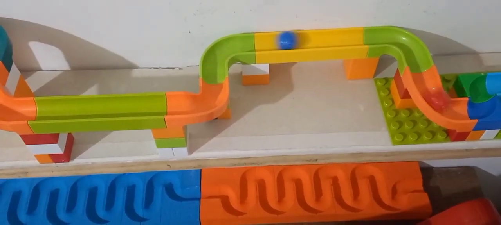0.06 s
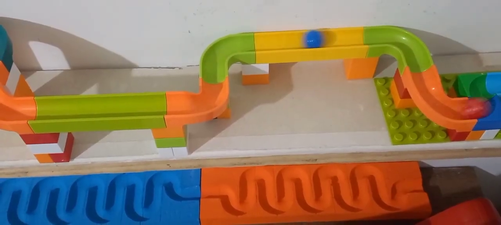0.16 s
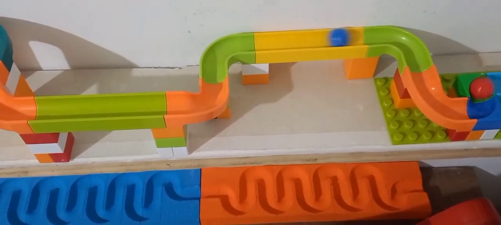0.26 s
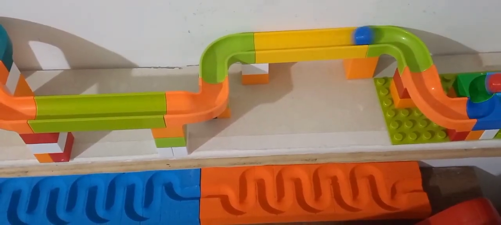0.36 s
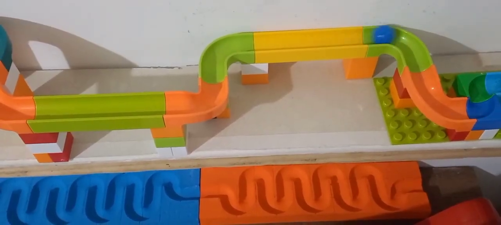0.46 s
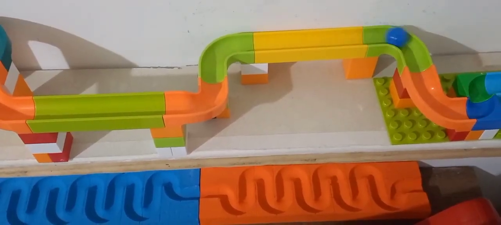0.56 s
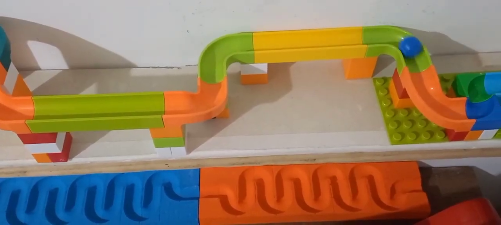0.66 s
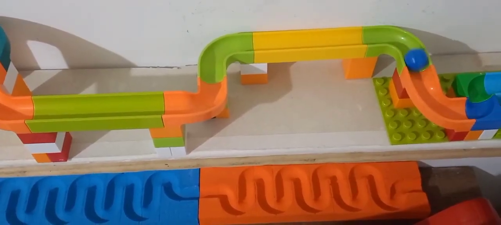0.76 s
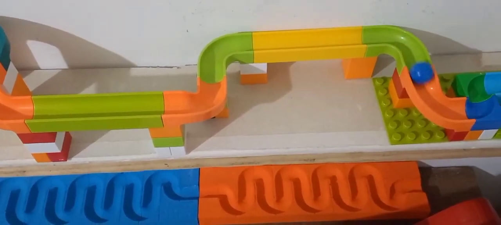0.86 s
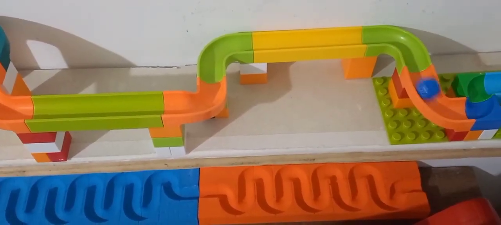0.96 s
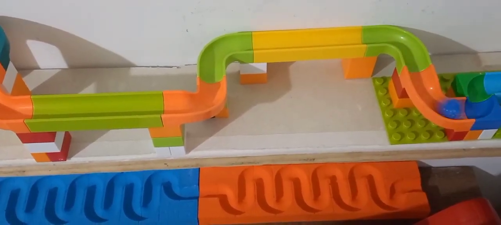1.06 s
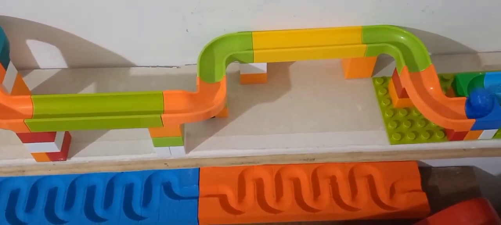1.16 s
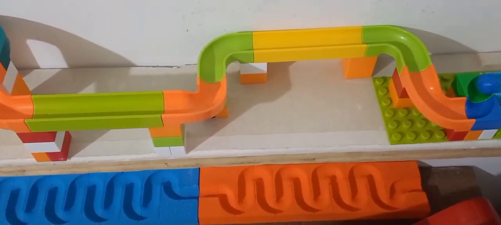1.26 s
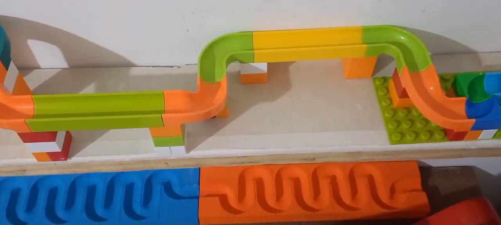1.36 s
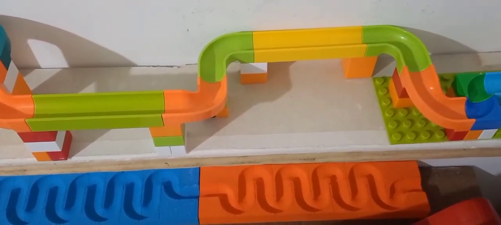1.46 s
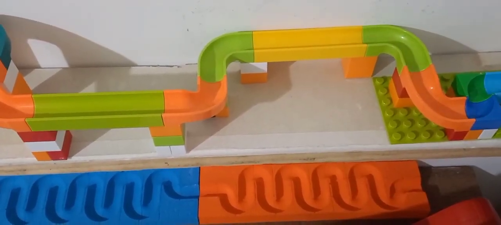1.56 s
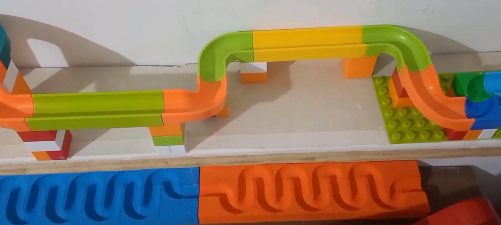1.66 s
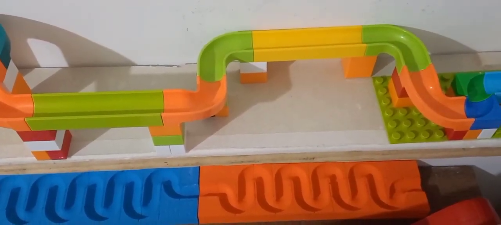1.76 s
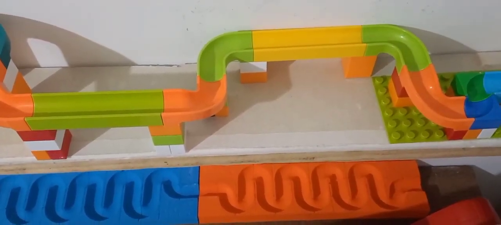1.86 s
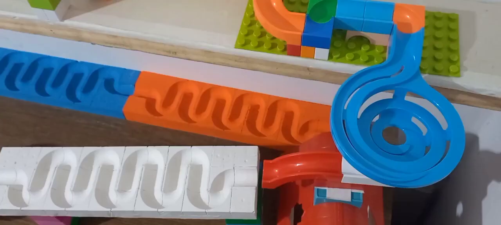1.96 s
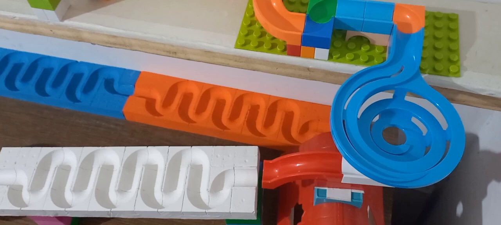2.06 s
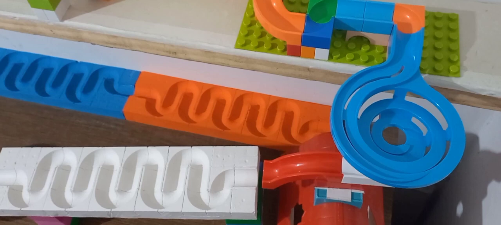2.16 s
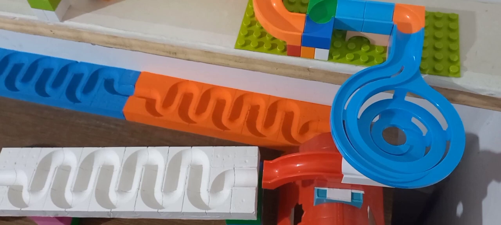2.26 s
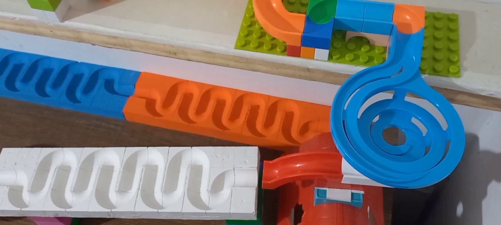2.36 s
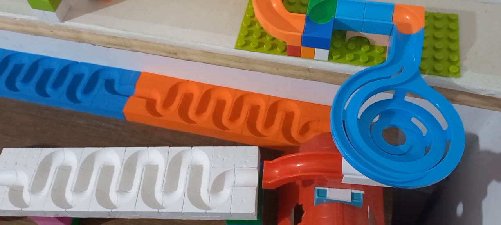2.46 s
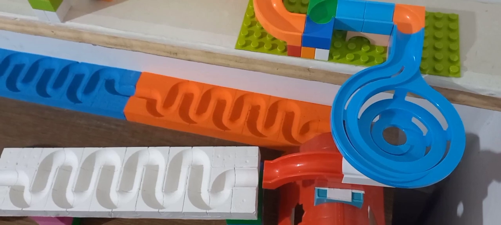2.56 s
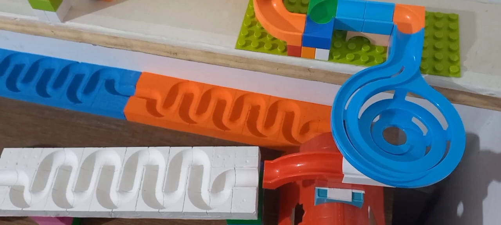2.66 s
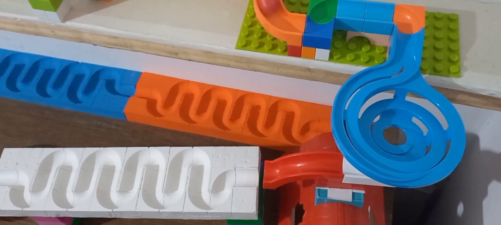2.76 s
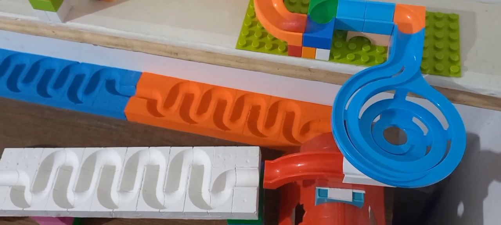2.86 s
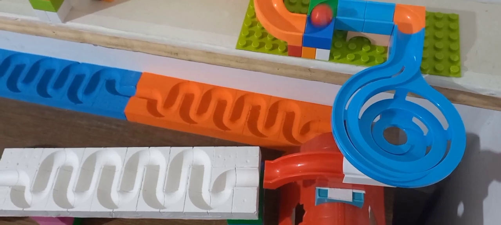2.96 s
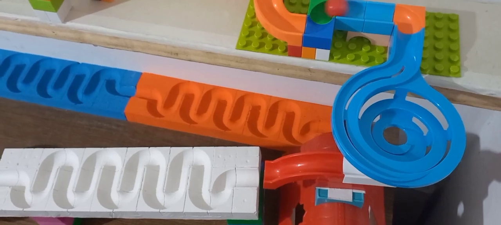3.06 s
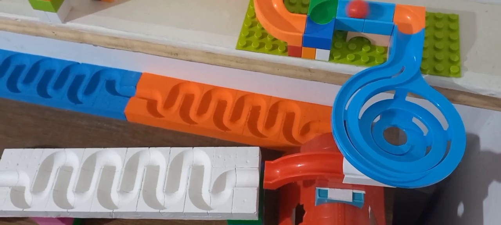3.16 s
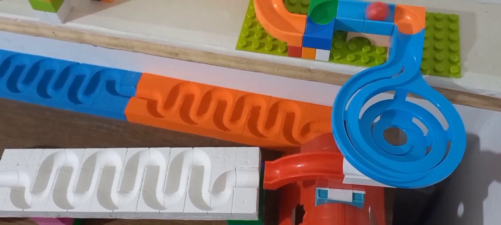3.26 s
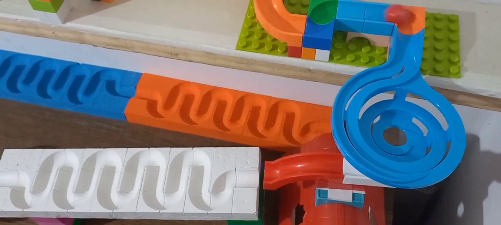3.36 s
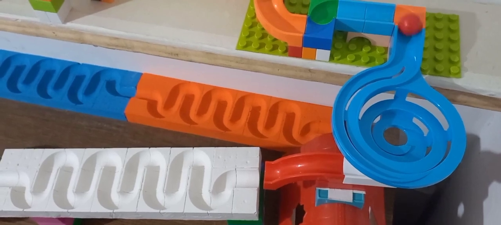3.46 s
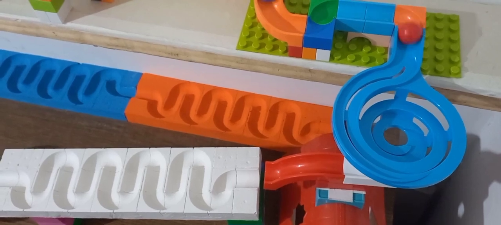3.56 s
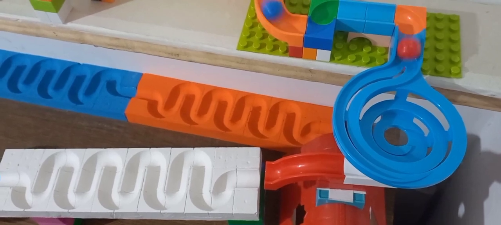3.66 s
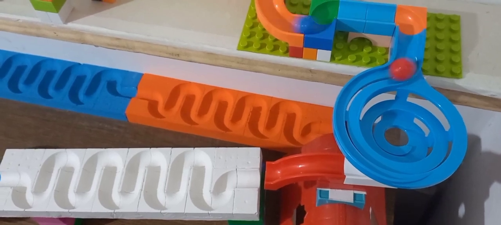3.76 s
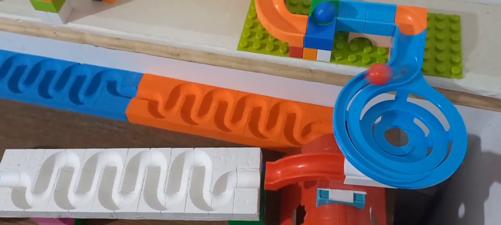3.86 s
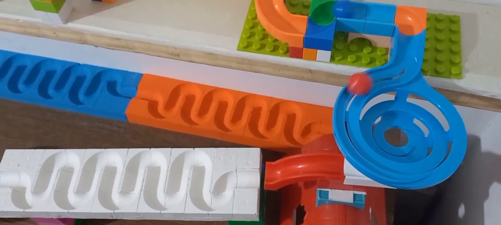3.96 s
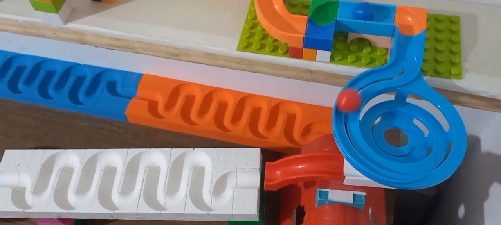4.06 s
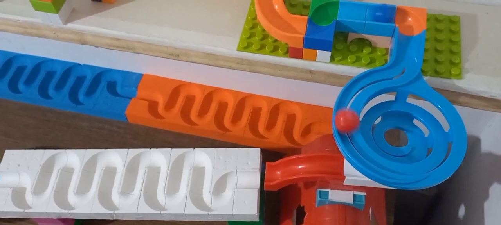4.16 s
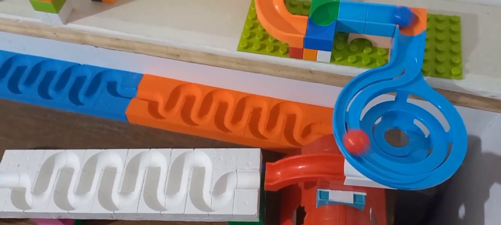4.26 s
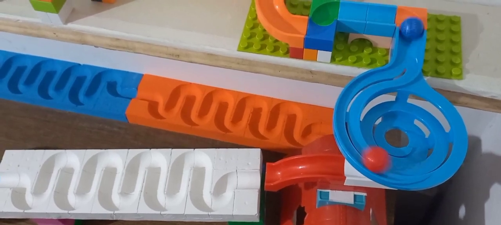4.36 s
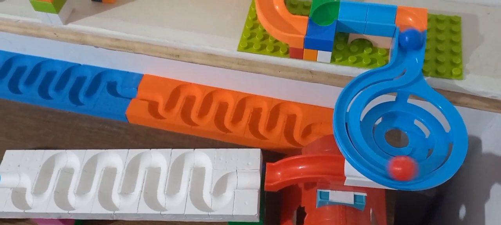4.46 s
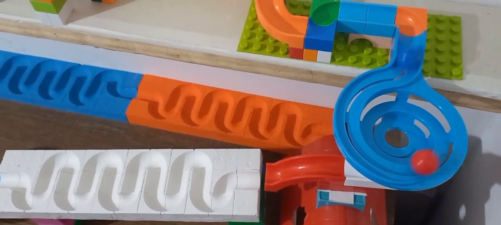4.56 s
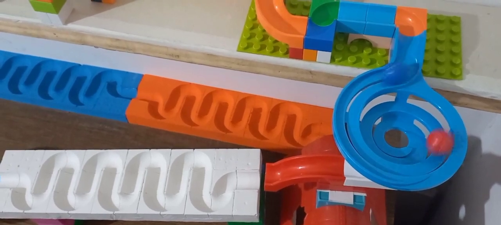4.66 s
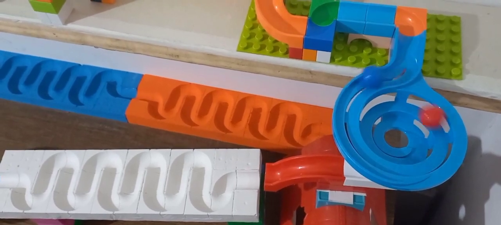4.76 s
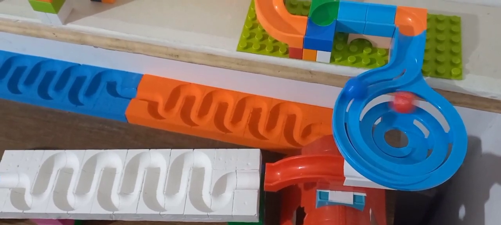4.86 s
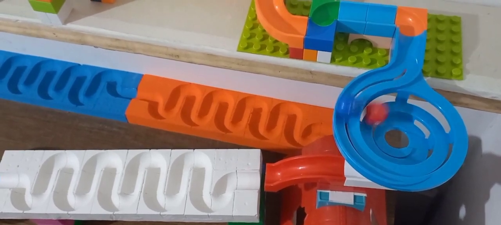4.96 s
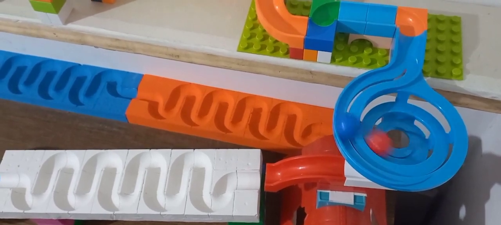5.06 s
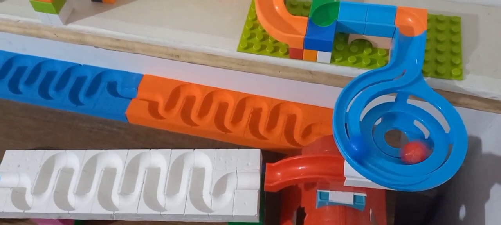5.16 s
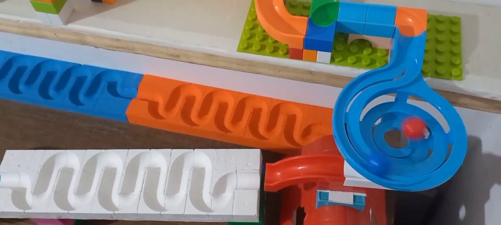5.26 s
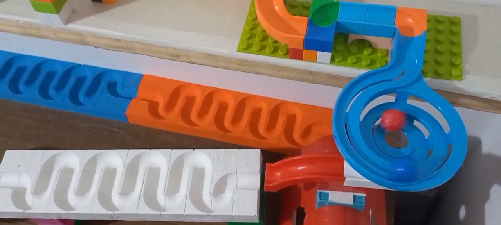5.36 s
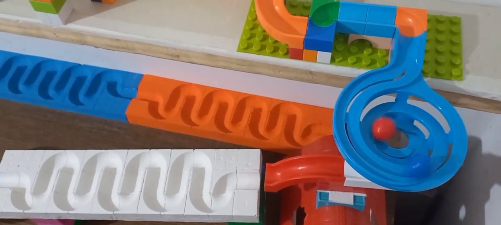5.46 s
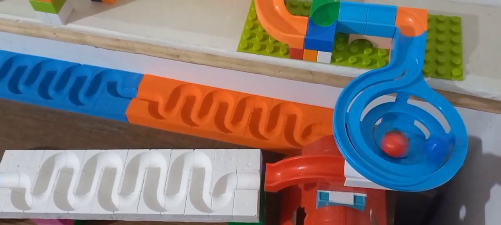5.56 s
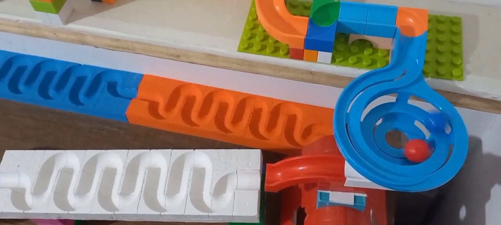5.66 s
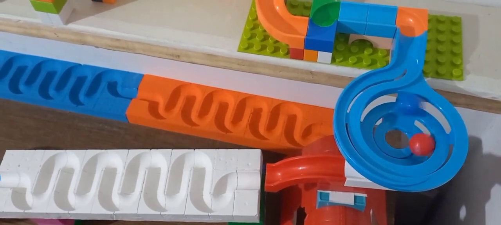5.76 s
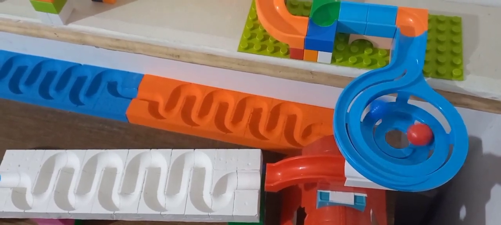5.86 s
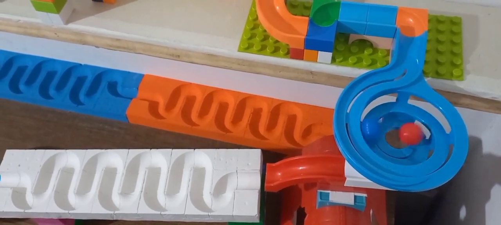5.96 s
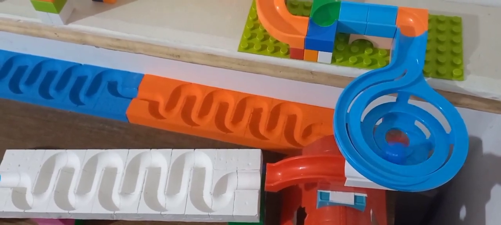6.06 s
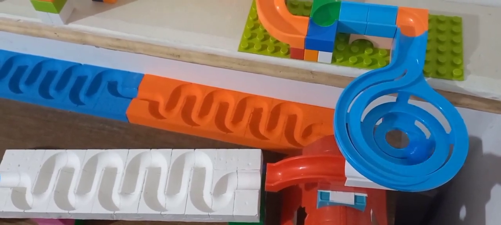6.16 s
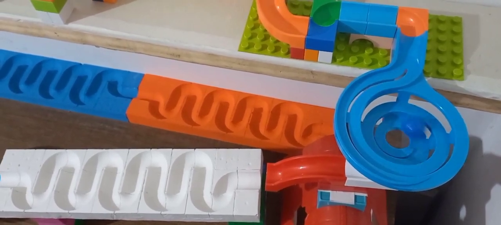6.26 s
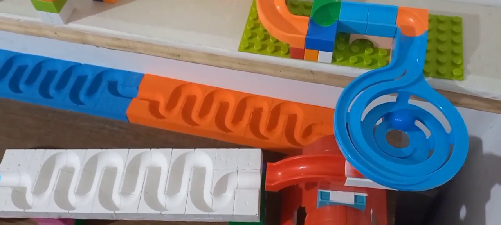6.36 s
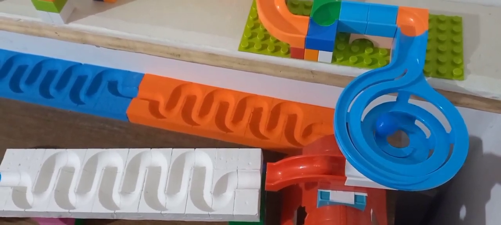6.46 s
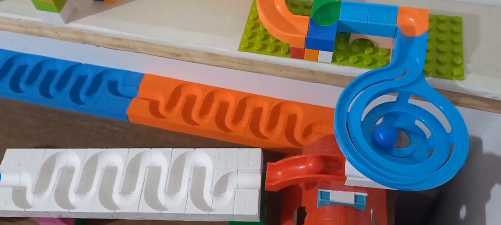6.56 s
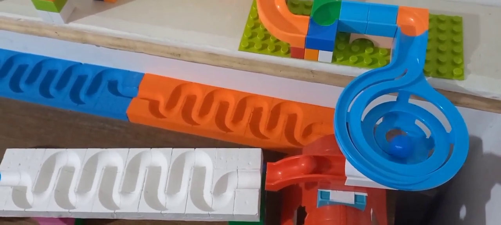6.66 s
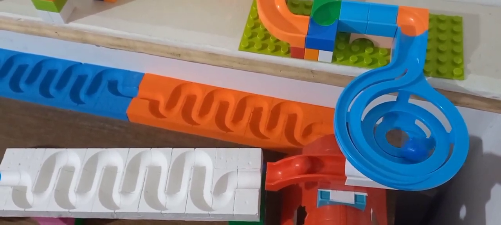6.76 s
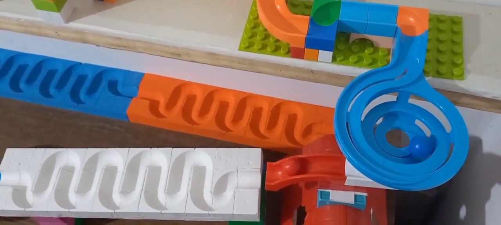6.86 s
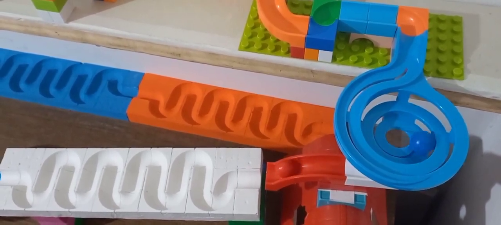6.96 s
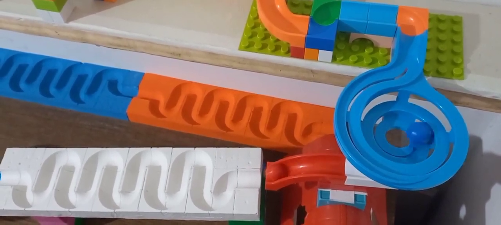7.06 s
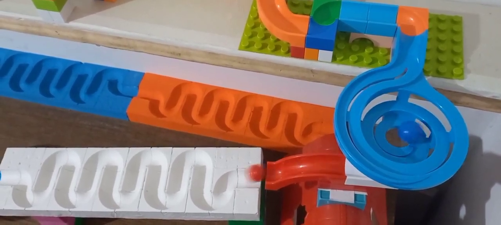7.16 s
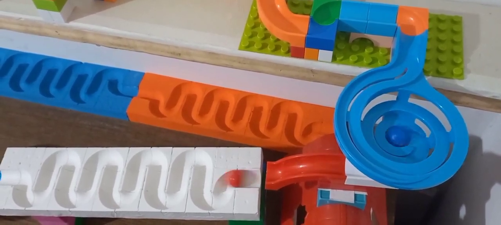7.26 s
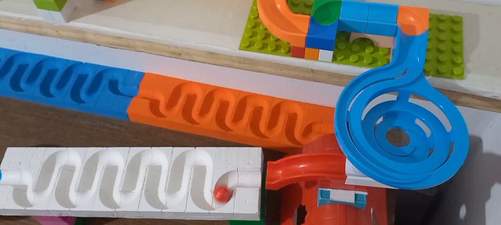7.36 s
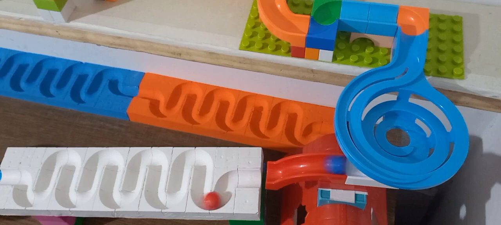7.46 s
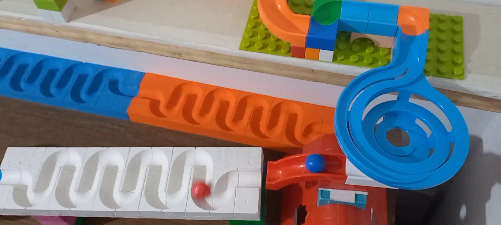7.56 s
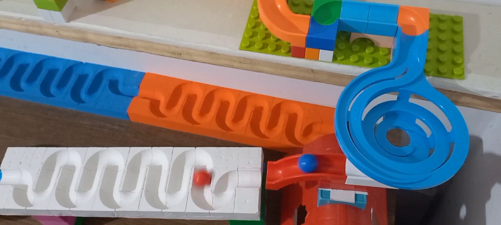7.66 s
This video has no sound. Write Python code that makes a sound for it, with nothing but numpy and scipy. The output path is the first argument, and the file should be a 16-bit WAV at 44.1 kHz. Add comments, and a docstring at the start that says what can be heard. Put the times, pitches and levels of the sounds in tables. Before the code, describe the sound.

Light papery rolling and plastic clicks indoors give way to swirling marble knocks in a dish and loud hollow drops.

```python
"""Two marbles run down a plastic toy track in a bare room: along open chutes, over toy blocks,
round a spiral funnel, through its hole into a hollow tower that booms, and into a winding groove.
Rolling is a hail of tiny bumps through the plastic's colour and modes; clacks are noise bursts with
ringing modes and a pinged spot. Steady noise is the air; the sound drops out twice, briefly."""
import sys
import numpy as np
from scipy import signal
from scipy.fft import rfft, irfft, next_fast_len
from scipy.io import wavfile
from scipy.ndimage import uniform_filter1d, map_coordinates

SR = 44100
rng = np.random.default_rng(int(sys.argv[2]) if len(sys.argv) > 2 else 0)


def wrap_up_sound(samples):
    """Save the sound to the file named by the first command line argument, as 16-bit audio."""
    columns = np.atleast_2d(samples).T
    # keep every value between -1 and 1, then stretch to whole-number steps
    tamed = np.clip(columns, -1, 1)
    steps = np.round(tamed * 32767).astype(np.int16)
    wavfile.write(sys.argv[1], SR, steps)


N = 339566
TIME = np.arange(N) / SR


def amp(db):
    """Amplitude factor of a level in dB."""
    return 10 ** (np.asarray(db) / 20)


def unit(x):
    """Scale to an RMS of one."""
    return x / np.sqrt(np.mean(x ** 2) + 1e-20)


def along(points, hz):
    """Interpolate (frequency [Hz], value) points on a log frequency axis."""
    point_hz, values = np.transpose(points)
    return np.interp(np.log(hz + 1), np.log(point_hz + 1), values)


def filtered(x, response):
    """Multiply the spectrum of x by a response of frequency."""
    size = next_fast_len(x.shape[-1] + SR // 4)
    spectrum = rfft(x, size) * response(np.fft.rfftfreq(size, 1 / SR))
    return irfft(spectrum, size)[..., :x.shape[-1]]


def causal(level_db, size=2048):
    """Minimum-phase impulse response for a level that depends on frequency."""
    level = amp(level_db(np.fft.rfftfreq(size, 1 / SR)))
    cepstrum = irfft(np.log(level + 1e-6))
    cepstrum[1:size // 2] *= 2
    cepstrum[size // 2 + 1:] = 0
    return irfft(np.exp(rfft(cepstrum)))


def treble(hz, edge_hz=3500):
    """Smooth step from 0 below the edge to 1 above it."""
    return 1 - 1 / (1 + (hz / edge_hz) ** 4)


def wobble(knots_per_s):
    """A random curve of straight pieces between knots."""
    knots = rng.standard_normal(int(N * knots_per_s / SR) + 4)
    return map_coordinates(knots, [TIME * knots_per_s], order=1)


def add(track, start_s, sound):
    """Mix a sound into a track at a time."""
    space = track[max(round(start_s * SR), 0):][:len(sound)]
    space += sound[:len(space)]


def spread(pair):
    """Two unrelated signals become a diffuse field: alike in the bass, unrelated in the treble."""
    # (frequency [Hz], left-right likeness [-1 to 1])
    likeness = [(100, 0.84), (300, 0.9), (700, 0.61), (1500, 0.063), (10000, 0)]

    def mid_side(hz):
        turn = np.arccos(np.clip(along(likeness, hz), -1, 1)) / 2
        return np.array([np.cos(turn), np.sin(turn)])

    mid, side = filtered(pair, mid_side)
    return np.array([mid + side, mid - side])


def in_room(x, rightward, wet_db, near_db):
    """Direct sound, quick echoes off shelf and wall, then the room's tail; the left lies in shadow."""
    # decay of the tail: (frequency [Hz], T60 [s])
    room_t60 = [(150, 1), (500, 0.52), (1400, 0.34), (2600, 0.49), (5500, 0.36), (12000, 0.3)]
    # source fully to the right: (frequency [Hz], left minus right [dB])
    head_shadow = [(120, -4.5), (250, -2.5), (500, -4.5), (1000, 2.5), (2200, -9), (4500, -3), (8000, -15),
                   (12000, -9)]
    hz, t, z = signal.stft(rng.standard_normal((2, SR)), SR, nperseg=256)
    decay = amp(-60 * t / along(room_t60, hz)[:, None])
    tail = signal.istft(z * decay, SR, nperseg=256)[1][:, :SR]
    t = np.arange(SR) / SR
    tail = unit(tail * (1 - np.exp(-t / 0.004)))
    near = unit(rng.standard_normal((2, SR)) * amp(-60 * t / 0.059))
    echoes = spread(amp(wet_db) * tail + amp(near_db) * near) / np.sqrt(SR)
    heard = x + signal.fftconvolve(x[None], echoes, axes=1)[:, :N]
    halves = np.array([[0.5], [-0.5]])  # left, right
    return filtered(heard, lambda hz: amp(rightward * along(head_shadow, hz) * halves))


def ring(modes, t):
    """Damped modes, struck at new strengths and phases; a wider mode dies sooner."""
    strengths_db = rng.normal(0, 2, len(modes))
    tones = np.zeros(len(t))
    for (hz, width_hz, db), extra_db in zip(modes, strengths_db):
        decay = np.exp(-np.pi * width_hz * t)
        tone = np.sin(2 * np.pi * (hz * t + rng.random()))
        tones += amp(db + extra_db) * np.sqrt(width_hz) * decay * tone
    return tones * (1 - np.exp(-t / 0.00027))


def ping(hz, t, t60_s):
    """One spot of plastic rings up and dies at a single pitch."""
    return unit(np.sin(2 * np.pi * hz * t) * amp(-60 * t / t60_s) * (1 - np.exp(-t / 0.001)))


def pitched(hits, ring_hz, scatter):
    """Each contact touches another spot, which rings a little above or below the part's note."""
    offsets = rng.uniform(-0.94, 1, len(hits))
    return [(*hit, ring_hz * np.exp(scatter * offset)) for hit, offset in zip(hits, offsets)]


def clacks(hits, colour, modes, t60_s, ring_db, spot_db, thin_db, gain_db):
    """Hard contacts shake the whole part with a bright chatter; soft ones mostly ring their spot."""
    track, t = np.zeros(N), np.arange(SR // 10) / SR
    usual_db = np.mean([hit[2] for hit in hits])
    crack = amp(-60 * t / 0.0025)  # the first touch stands above the rattle
    for start_s, db, treble_db, spot_hz in hits:
        hardness_db = treble_db - usual_db

        def body_db(hz):
            return along(colour, hz) + hardness_db * treble(hz) - thin_db * (1 - treble(hz, 1800))

        chatter = rng.standard_normal(len(t)) * (amp(-60 * t / t60_s) + crack)
        clack = unit(signal.fftconvolve(chatter, causal(body_db))[:len(t)])
        clack += amp(ring_db) * unit(ring(modes, t))
        clack += amp(spot_db - 0.5 * hardness_db) * ping(spot_hz, t, t60_s)
        add(track, start_s, amp(db + gain_db) * unit(clack))
    return track


def run_level(runs, t):
    """Level in dB: each run starts quickly, grows with speed; a bend or step brakes it at its end."""
    start_db_per_s, gather_db_per_s, brake_db_per_s = 494.5, 4.5, 231
    levels_db = []
    for start, end, db in runs:
        level_db = db - gather_db_per_s * np.maximum(end - t, 0)
        level_db = level_db - start_db_per_s * np.maximum(start - t, 0)
        levels_db.append(level_db - brake_db_per_s * np.maximum(t - end, 0))
    return np.max(levels_db, axis=0)


def bumps(runs, bumps_per_s, spike_db, flutter_db):
    """Force of a rolling marble: a hail of tiny bumps, swelling as it sways in the groove."""
    sizes = amp(spike_db * np.minimum(rng.exponential(size=N), 4)) * rng.choice([-1, 1], N)
    force = unit(sizes * (rng.random(N) < bumps_per_s / SR))
    return force * amp(run_level(runs, TIME) + flutter_db * wobble(35))


def rolling(runs, colour, modes, bumps_per_s, spike_db, dull_db, ring_db, gain_db):
    """Soft bumps sound the plastic, treble cut; each mode swells and fades as its nodes are crossed."""
    force = bumps(runs, bumps_per_s, spike_db, flutter_db=3.0)
    body = causal(lambda hz: along(colour, hz) + dull_db * treble(hz))
    sound = signal.oaconvolve(force, body / np.linalg.norm(body))[:N]
    strengths = np.array([amp(db + dull_db * treble(hz)) * np.sqrt(width) for hz, width, db in modes])
    strengths = strengths / np.linalg.norm(strengths)
    for (hz, width_hz, _), strength in zip(modes, strengths):
        tone = signal.lfilter(*signal.iirpeak(hz, hz / width_hz, SR), force)
        tone = tone * np.sqrt(SR / (np.pi * width_hz))  # equal energy for any width
        swell = unit(amp(5 * wobble(22)))
        sound = sound + amp(ring_db) * strength * tone * swell
    return amp(gain_db) * sound


def moving(x, sway_ms=0.6, echo_db=-5):
    """The track wall's echo comes early or late as the marble travels, so its colour glides."""
    delay_ms = 2 + sway_ms * uniform_filter1d(wobble(4.6), SR // 10)
    return x + amp(echo_db) * np.interp(TIME - delay_ms / 1000, TIME, x)


def skips(runs, ticks_per_s, pitch_hz, gain_db):
    """The marble hops on the groove's walls: small ticks, each at its own pitch."""
    track, t = np.zeros(N), np.arange(SR // 30) / SR
    first, last = runs[0][0], runs[-1][1]
    times = np.arange(first, last, 1 / ticks_per_s)
    for at, (late, pitch, size) in zip(times, rng.standard_normal((len(times), 3))):
        at = np.clip(at + late / ticks_per_s / 2, first, last)
        tick = ping(pitch_hz * np.exp(0.296 * np.tanh(pitch)), t, 0.0076)
        add(track, at, amp(run_level(runs, at) + gain_db + 3.6 * size) * tick)
    return track


def chutes():
    """Thin open channels, each piece with its own note: a light, papery rattle."""
    # contacts: (time [s], level [dB], treble [dB], strongest ring [Hz])
    contacts = [(0.021, -29.5, -23.5, 1225), (0.102, -35.5, -36.5, 1480), (0.229, -28, -28, 2150),
                (0.322, -25, -5.5, 1660), (0.44, -24.5, -20.5, 1920), (0.691, -36, -29.5, 2040),
                (0.802, -38, -21, 2270), (0.85, -42, -36, 2260), (1.017, -28, -13.5, 1820),
                (1.106, -32.5, -37, 2130), (1.167, -31.5, -13, 1940), (1.214, -27.5, -20.5, 1780),
                (1.383, -39.5, -30, 2780), (1.455, -41.5, -37, 2566), (1.591, -37.5, -26.5, 2030),
                (1.87, -35.5, -18, 1770), (1.9, -20, -6.5, 1950)]
    # rolling: (start [s], end [s], level at full speed [dB])
    runs = [(0, 0.38, -49), (0.56, 0.87, -68), (0.98, 1.1, -56.5), (1.06, 1.24, -47.5), (1.33, 1.46, -64),
            (1.6, 1.8, -63.5), (1.91, 1.95, -43)]
    # broad spectrum: (frequency [Hz], level [dB per Hz])
    colour = [(35, -21), (60, -29.5), (380, -12), (417, -12), (1140, -2), (1220, -2), (1340, -12),
              (1860, -2.5), (3850, -15.5), (5720, -18), (6900, -30.5), (8320, -27.5), (16000, -32)]
    # ringing modes: (frequency [Hz], width [Hz], level [dB])
    modes = [(1267, 9.6, -11), (1448, 16, 11), (1630, 31, -8), (1714, 58, -40), (2200, 23, 3),
             (2756, 20, 3)]
    hits = clacks(contacts, colour, modes, t60_s=0.025, ring_db=-8.0, spot_db=-2.5,
                  thin_db=1.0, gain_db=-26.5)
    roll = rolling(runs, colour, modes, bumps_per_s=380, spike_db=4.5, dull_db=-4.0,
                   ring_db=-16, gain_db=-6.5)
    ticks = skips(runs, ticks_per_s=26, pitch_hz=1604, gain_db=-7.5)
    return in_room(hits + moving(roll) + ticks, rightward=0.39, wet_db=4.5, near_db=5.5)


def air(level_db=-70):
    """Faint steady room noise: diffuse, filtered white noise."""
    # spectrum: (frequency [Hz], level [dB per Hz])
    colour = [(25, -21.5), (100, 6), (1000, 4.5), (8000, -21), (16000, -7)]
    noise = spread(rng.standard_normal((2, N)))
    return amp(level_db) * unit(filtered(noise, lambda hz: amp(along(colour, hz))))


def blocks():
    """Stiff hollow bricks click with one strong resonance."""
    # contacts: (time [s], level [dB], treble [dB])
    contacts = [(2.013, -27.5, -31), (2.163, -31, -28), (2.239, -25.5, -29), (2.265, -24, -25.5),
                (2.451, -19, -12.5), (2.488, -20.5, -19.5), (2.688, -21, -22), (2.825, -33, -28),
                (2.872, -30.5, -21), (2.955, -33.5, -11.5), (3.046, -28, -19), (3.089, -23, -20.5),
                (3.445, -32.5, -33.5), (3.485, -33.5, -30), (3.554, -29.5, -30)]
    # rolling: (start [s], end [s], level at full speed [dB])
    runs = [(2.01, 2.3, -53.5), (2.34, 2.44, -45), (2.48, 2.54, -42.5), (2.6, 2.8, -48.5),
            (2.91, 2.99, -42), (3.08, 3.12, -43.5), (3.18, 3.3, -59.5), (3.5, 3.75, -60)]
    # broad spectrum: (frequency [Hz], level [dB per Hz])
    colour = [(35, -93), (60, -39), (124, -22), (244, -10.5), (480, -16.5), (1280, -4), (1700, -8.5),
              (2470, -5), (3670, -23.5), (4320, -18), (6000, -22.5), (8120, -40), (9790, -30.5),
              (13300, -34.5), (16000, -39)]
    # ringing modes: (frequency [Hz], width [Hz], level [dB])
    modes = [(1350, 45, -25), (1580, 55, -42), (2440, 86, 25)]
    hits = clacks(pitched(contacts, ring_hz=2360, scatter=0.07), colour, modes, t60_s=0.015,
                  ring_db=-6.0, spot_db=5.0, thin_db=13, gain_db=-23.0)
    roll = rolling(runs, colour, modes, bumps_per_s=400, spike_db=2.0, dull_db=-3.5,
                   ring_db=-20.0, gain_db=-6)
    ticks = skips(runs, ticks_per_s=22, pitch_hz=1970, gain_db=-23)
    return in_room(hits + moving(roll) + ticks, rightward=1.0, wet_db=2.0, near_db=4.5)


def funnel():
    """The wide dish rings on as the marbles circle and knock on its rims."""
    # contacts: (time [s], level [dB], treble [dB])
    contacts = [(3.793, -24.5, -15), (3.896, -29, -18.5), (3.99, -33, -22), (4.127, -40, -29.5),
                (4.289, -36, -26), (4.417, -33.5, -31), (4.655, -21.5, -7), (4.673, -22.5, -7.5),
                (4.739, -23, -15.5), (5.248, -26, -12.5), (5.289, -25, -17.5), (5.307, -22, -8.5),
                (5.548, -19, -5.5), (5.642, -23, -19), (5.742, -25, -16), (5.768, -27, -16.5),
                (5.925, -34.5, -10.5), (5.989, -36, -7.5), (6.106, -25, -12.5), (6.841, -34, -11.5),
                (6.879, -30, -19)]
    # rolling: (start [s], end [s], level at full speed [dB])
    runs = [(3.79, 3.85, -42.5), (3.9, 4.01, -55), (4.08, 4.3, -65), (4.45, 4.62, -57), (4.68, 4.77, -44),
            (4.93, 5.06, -55), (5.09, 5.24, -51), (5.3, 5.34, -39), (5.44, 5.5, -49), (5.57, 5.8, -44.5),
            (5.88, 6.0, -51), (6.06, 6.48, -46), (6.55, 6.73, -64.5), (6.87, 6.91, -51.5),
            (7.08, 7.16, -54.5)]
    # broad spectrum: (frequency [Hz], level [dB per Hz])
    colour = [(35, -74), (60, -25), (168, -25.5), (250, -10), (315, -12), (458, -8), (1410, -5.5),
              (1620, -13), (1740, -4.5), (2350, -2), (3190, -10.5), (6430, -9.5), (8120, -28.5),
              (13000, -15), (16000, -48)]
    # ringing modes: (frequency [Hz], width [Hz], level [dB])
    modes = [(1012, 18, -1.5), (1568, 90, 0.5), (1930, 59, -4.5), (2367, 37, 3), (2650, 23, -6),
             (3620, 62, -11), (4725, 10, -5), (5930, 58, -16)]
    hits = clacks(pitched(contacts, ring_hz=2390, scatter=0.1), colour, modes, t60_s=0.055,
                  ring_db=-8, spot_db=-4.5, thin_db=2.0, gain_db=-23.0)
    roll = rolling(runs, colour, modes, bumps_per_s=810, spike_db=4, dull_db=-12.0,
                   ring_db=-5.5, gain_db=-6)
    return in_room(hits + moving(roll), rightward=0.9, wet_db=2.0, near_db=3.5)


def tower_hits():
    """Every contact in the tower: the same tumble after each fall, and further contacts."""
    # falls through the funnel's hole: (time [s], level [dB])
    drops = [(6.188, -4.5), (7.431, -5)]
    # a double crack and two bounces: (time after the fall [s], level step [dB], treble [dB])
    tumble = [(0, -1, -13), (0.0055, 2.5, -14), (0.046, -2.5, -18), (0.067, -3, -16.5)]
    # a late bounce, a lone knock, and a double crack cut short by the dropout:
    # (time [s], level [dB], treble [dB])
    further_contacts = [(6.299, -6.5, -16), (7.165, -10.5, -17), (7.409, -10, -14), (7.414, -4.5, -18.5)]
    hits = []
    for start_s, db in drops:
        for after_s, step_db, treble_db in tumble:
            hits.append((start_s + after_s, db + step_db, treble_db))
    return hits + list(further_contacts)


def tower():
    """A marble falls from the funnel and cracks onto the tower's ramp, close to the microphone."""
    # broad spectrum: (frequency [Hz], level [dB per Hz])
    colour = [(290, -63), (500, -24.5), (558, -23), (659, -28), (930, -33), (1010, -15), (1140, -43),
              (1330, -18.5), (1710, -21.5), (2480, -4.5), (3900, -17), (4730, -12), (7990, -33),
              (13500, -24.5)]
    # ringing modes: (frequency [Hz], width [Hz], level [dB])
    modes = [(2570, 73, -7), (3210, 95, -3.5), (4520, 30, -24), (4660, 55, -23), (5570, 170, 6)]
    hits = clacks(pitched(tower_hits(), ring_hz=2500, scatter=0.04), colour, modes, t60_s=0.026,
                  ring_db=-11.5, spot_db=-1.0, thin_db=-1.5, gain_db=-25.0)
    return in_room(hits, rightward=1, wet_db=0, near_db=-5)


def boom(contact_db=-41, roll_db=-5):
    """The tower's hollow shell booms at each contact and drones while a marble winds down it."""
    # rolling: (start [s], end [s], level at full speed [dB])
    runs = [(6.87, 7.15, -49.5), (7.175, 7.3, -34.5), (7.44, 7.48, -32.5)]
    # shell modes: (frequency [Hz], width [Hz], level [dB])
    modes = [(108, 21, -18.5), (152, 21, -14), (189, 22, -4), (230.8, 21, 0), (304, 21, -5.5),
             (365.4, 19, 1), (405, 50, -10), (527, 21, -16)]
    t = np.arange(SR // 2) / SR
    shell = ring(modes, t)
    force = bumps(runs, bumps_per_s=700, spike_db=3.5, flutter_db=-5.0)
    track = amp(roll_db) * signal.fftconvolve(force, shell / np.linalg.norm(shell))[:N]
    onset = 1 - np.exp(-t / 0.0097)
    for start_s, db, _ in tower_hits():
        add(track, start_s, amp(db + contact_db) * unit(ring(modes, t) * onset))
    return in_room(track, rightward=0.57, wet_db=-7.0, near_db=-7.5)


def zigzag():
    """The first marble leaves the tower and rolls into a winding groove with a hollow note."""
    # rolling: (start [s], end [s], level at full speed [dB])
    runs = [(7.255, 7.32, -41.5), (7.34, 7.55, -49)]
    # broad spectrum: (frequency [Hz], level [dB per Hz])
    colour = [(60, -27), (700, -4.5), (2000, -10), (3500, -12), (6000, -14), (8000, -22), (14000, -15.5)]
    # ringing modes: (frequency [Hz], width [Hz], level [dB])
    modes = [(989, 8, -9.5), (1670, 45, -5), (2060, 180, -5.5)]
    roll = rolling(runs, colour, modes, bumps_per_s=300, spike_db=4, dull_db=-2, ring_db=2, gain_db=-6)
    return in_room(moving(roll), rightward=0.9, wet_db=2.0, near_db=5.5)


def scene():
    """Sum of the track's parts and the air."""
    return chutes() + blocks() + funnel() + tower() + zigzag() + boom() + air()


def record(dry, low_hz=50, top_hz=15700):
    """The microphone sheds deep bass, the sound drops out twice, and the top rolls off steeply."""
    # (start [s], end [s])
    dropouts = [(1.951, 2.0105), (7.4185, 7.4312)]
    heard = filtered(dry, lambda hz: treble(hz, low_hz))
    live = np.ones(N)
    for start, end in dropouts:
        live[(TIME > start) & (TIME < end)] = 0.01
    live = uniform_filter1d(live, size=64)
    return filtered(heard * live, lambda hz: 1 / (1 + (hz / top_hz) ** 80))


dry = scene()
out = record(dry)
wrap_up_sound(out)
```